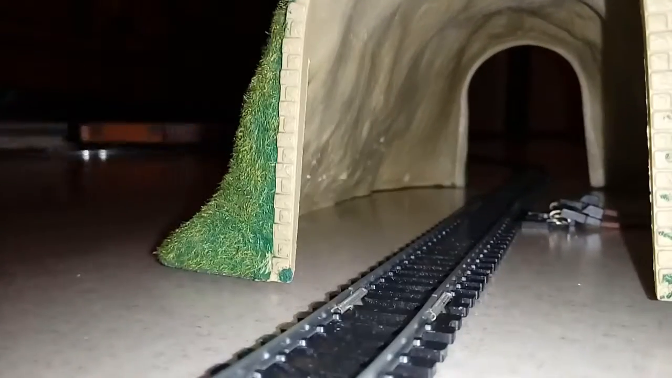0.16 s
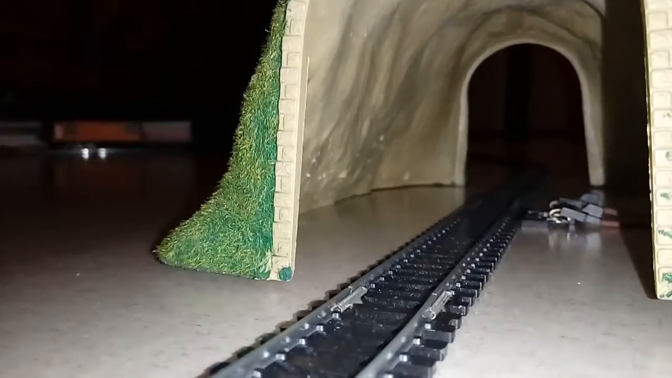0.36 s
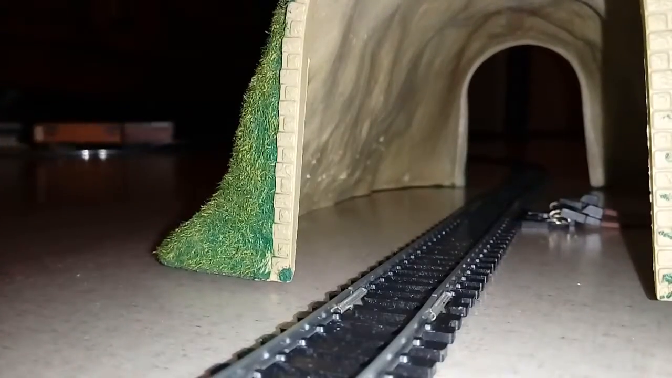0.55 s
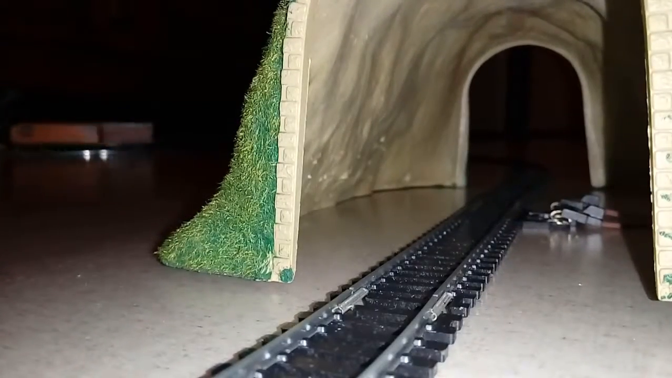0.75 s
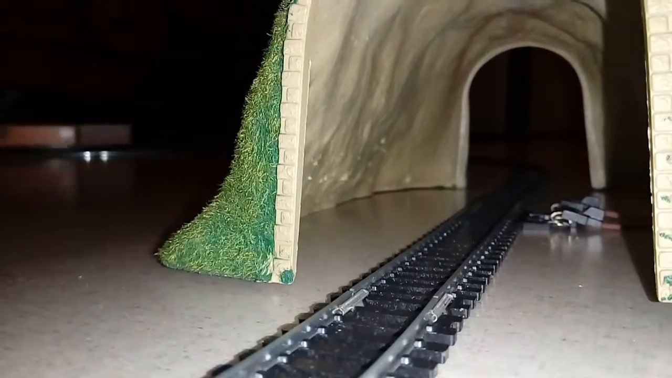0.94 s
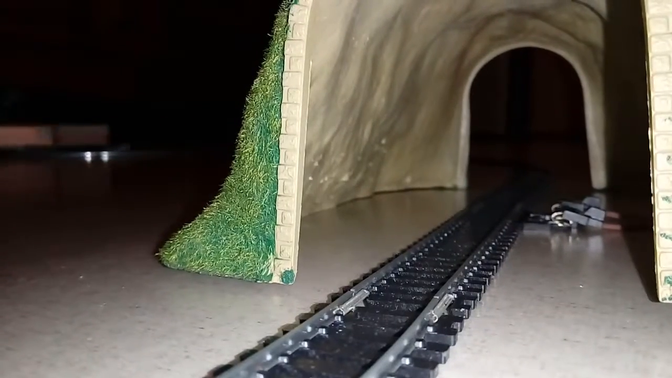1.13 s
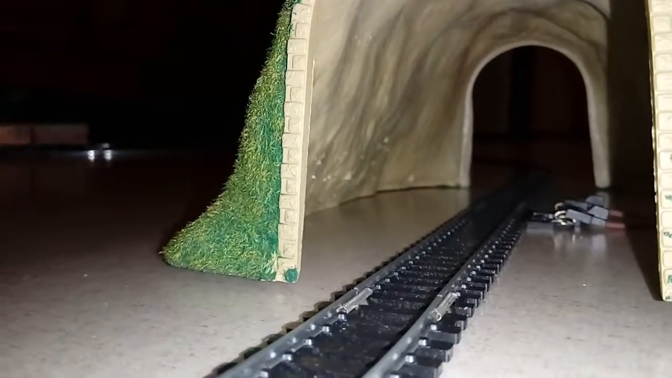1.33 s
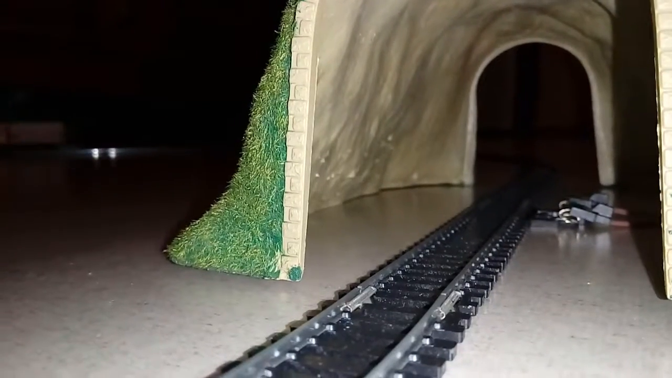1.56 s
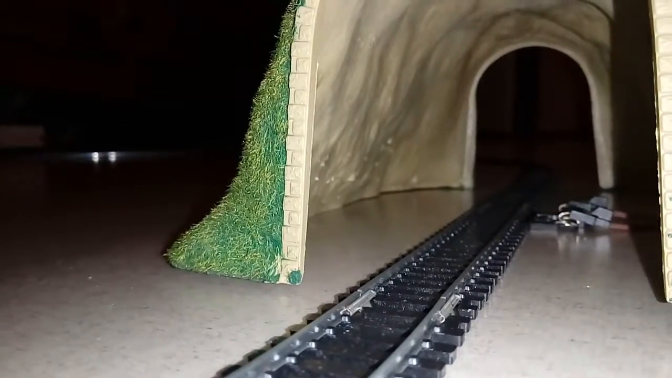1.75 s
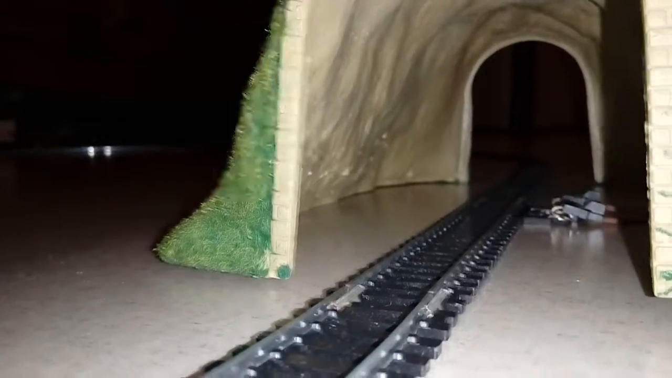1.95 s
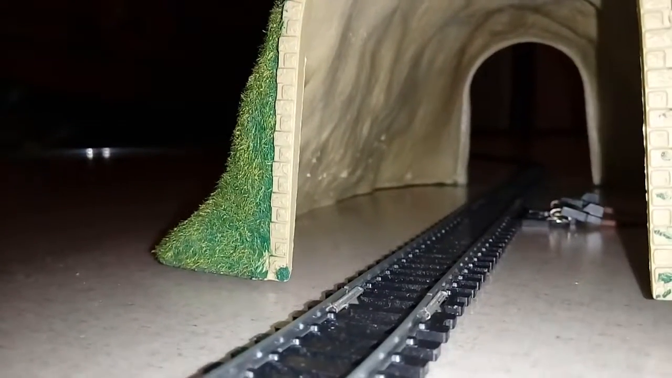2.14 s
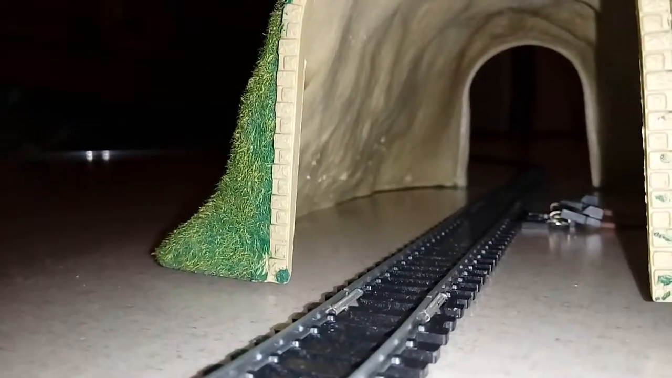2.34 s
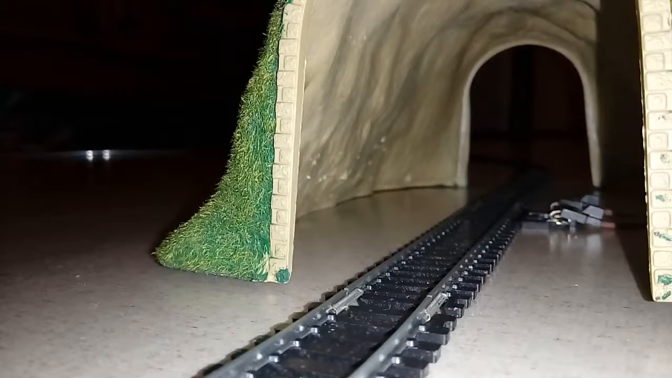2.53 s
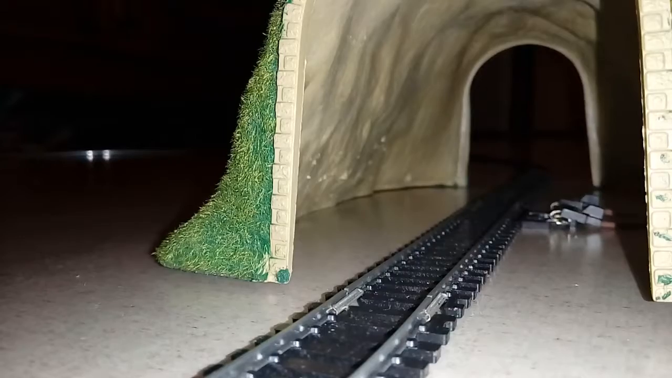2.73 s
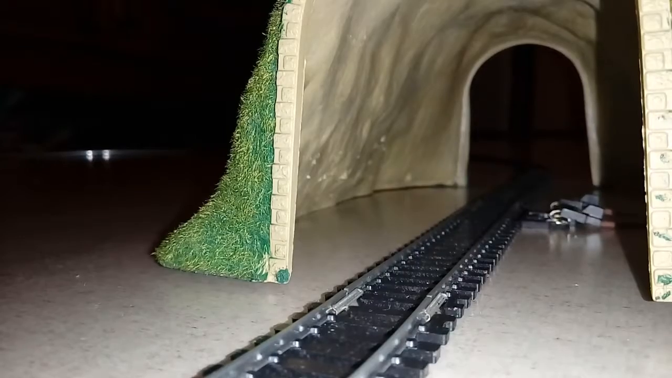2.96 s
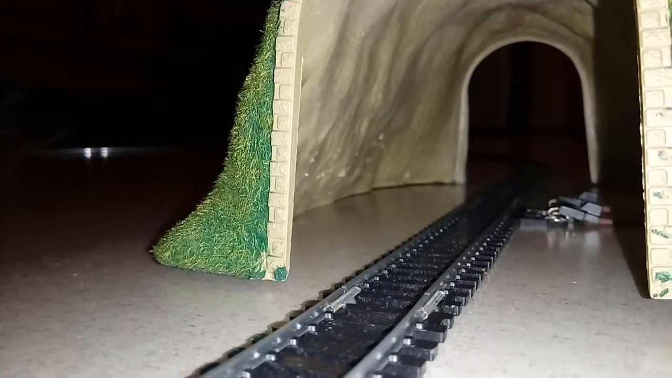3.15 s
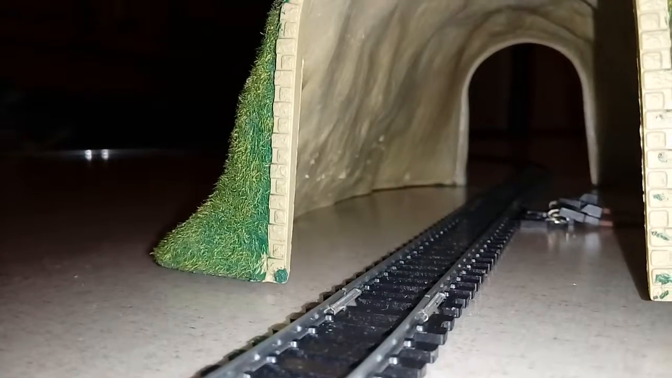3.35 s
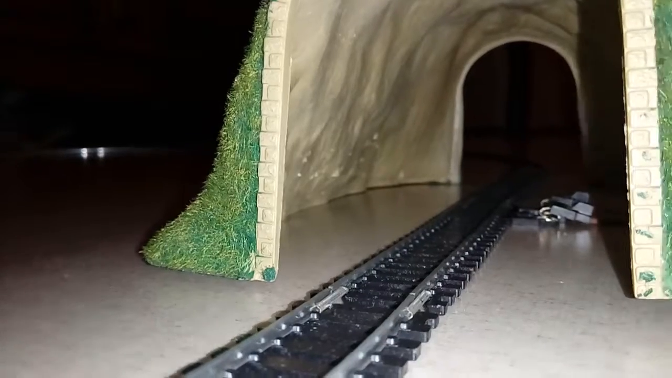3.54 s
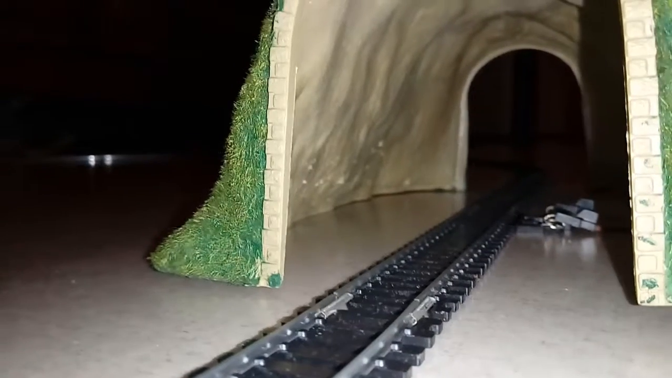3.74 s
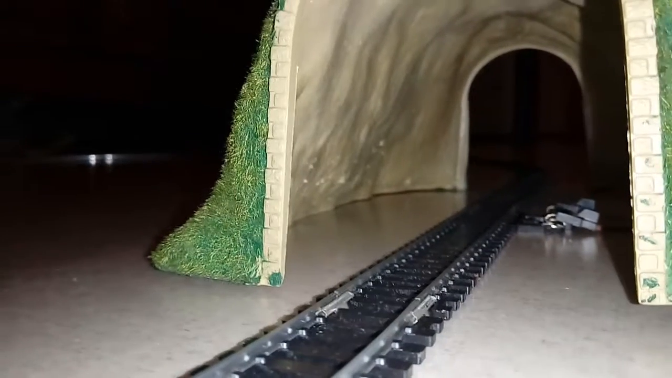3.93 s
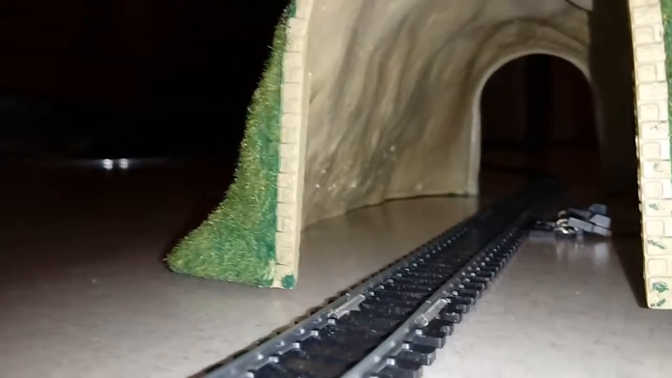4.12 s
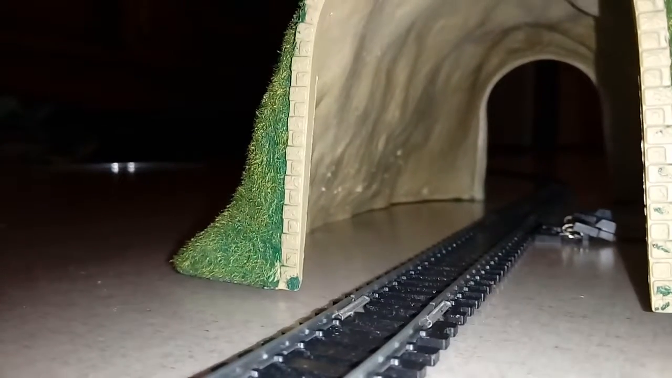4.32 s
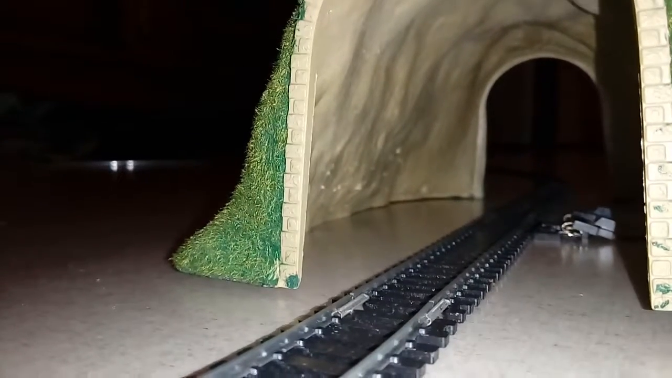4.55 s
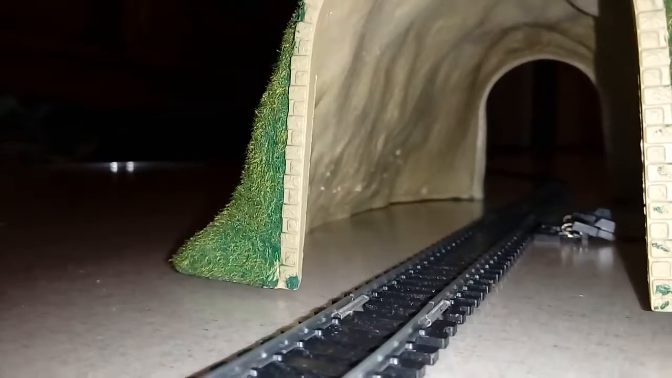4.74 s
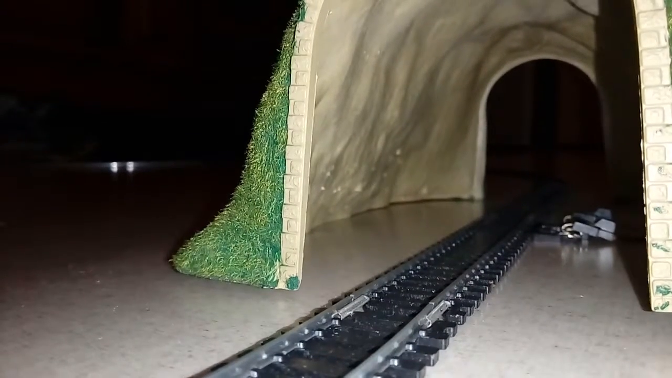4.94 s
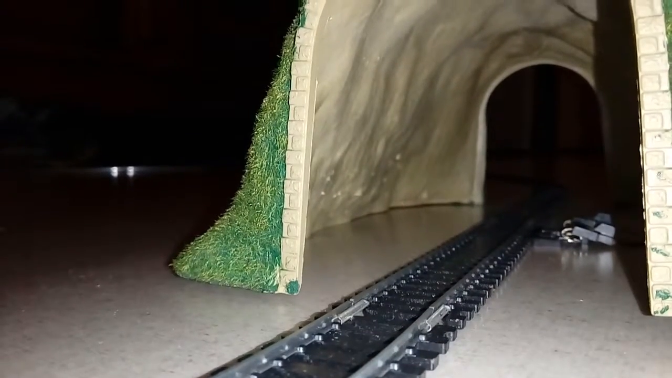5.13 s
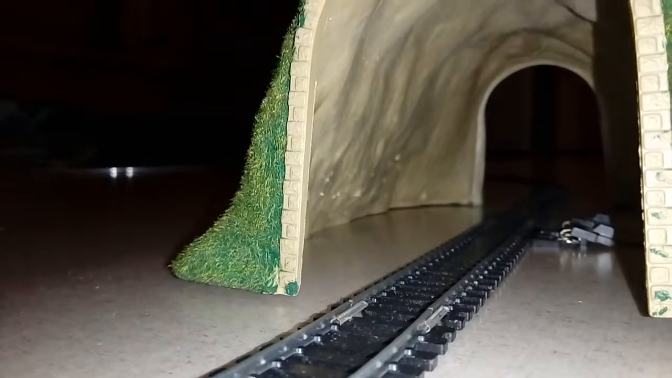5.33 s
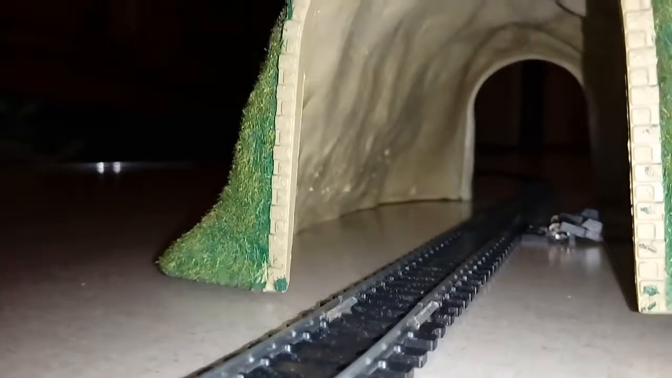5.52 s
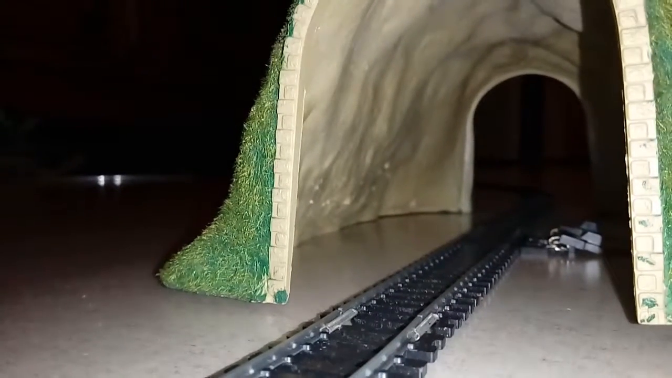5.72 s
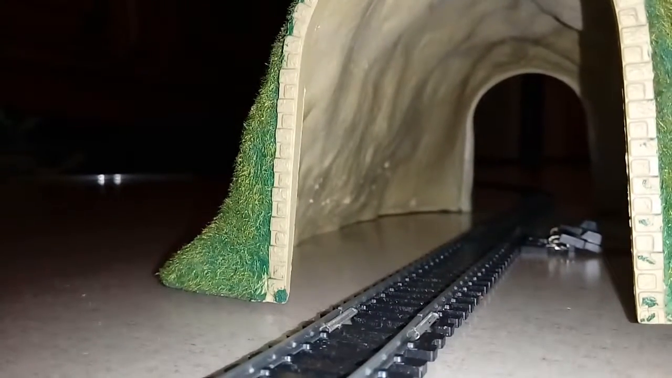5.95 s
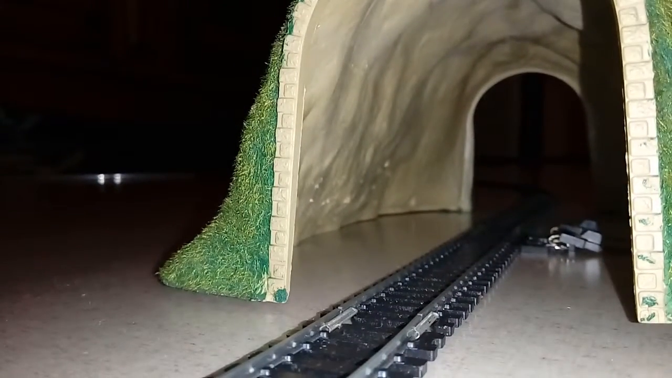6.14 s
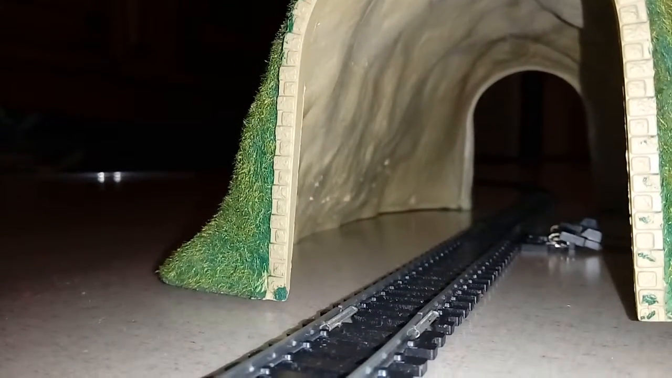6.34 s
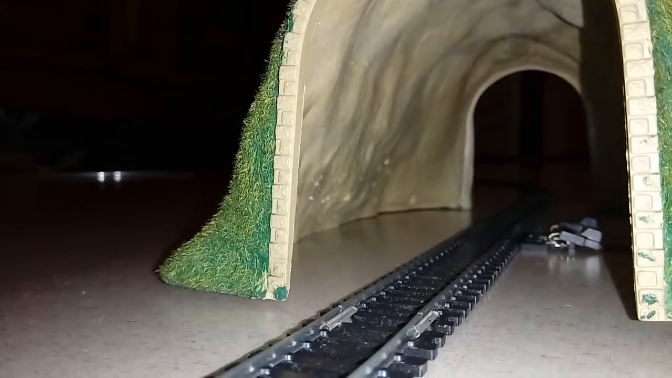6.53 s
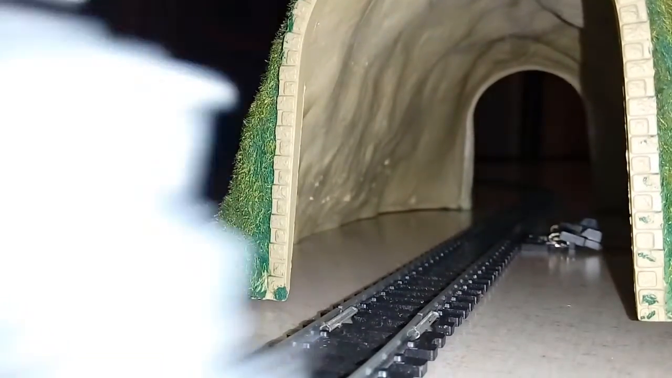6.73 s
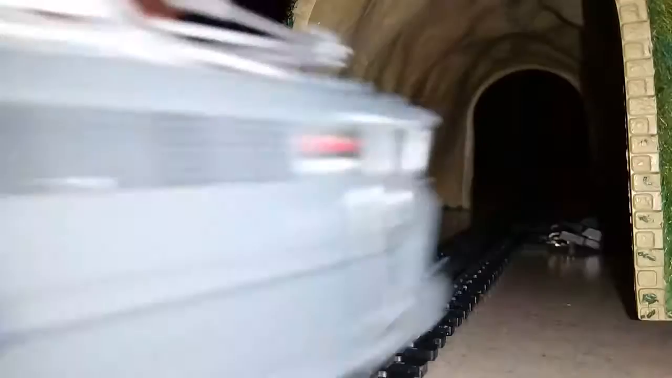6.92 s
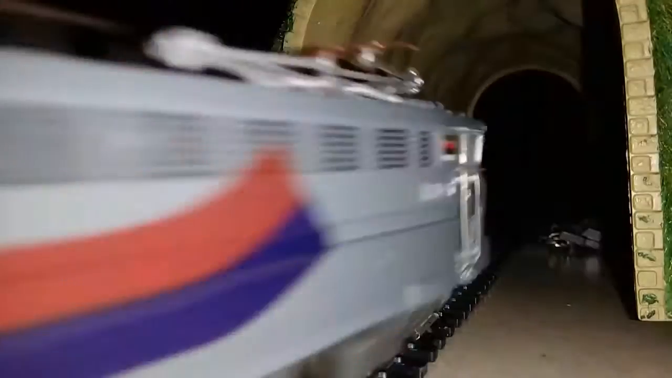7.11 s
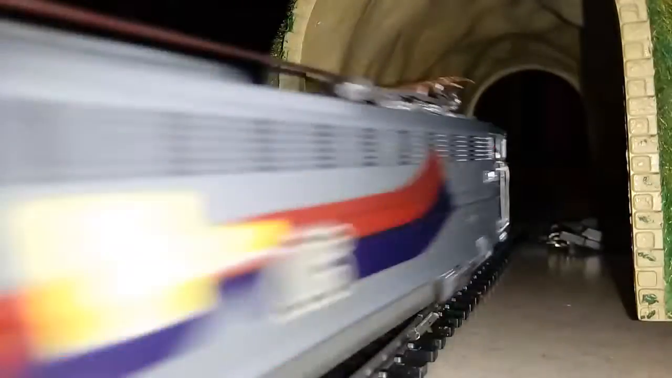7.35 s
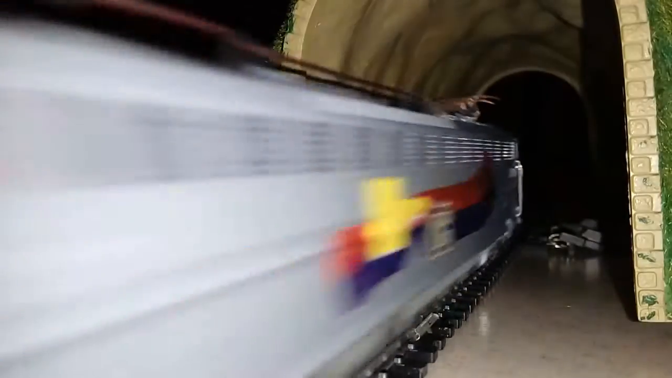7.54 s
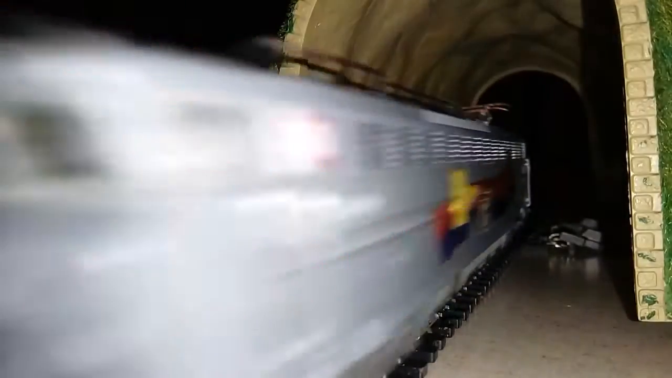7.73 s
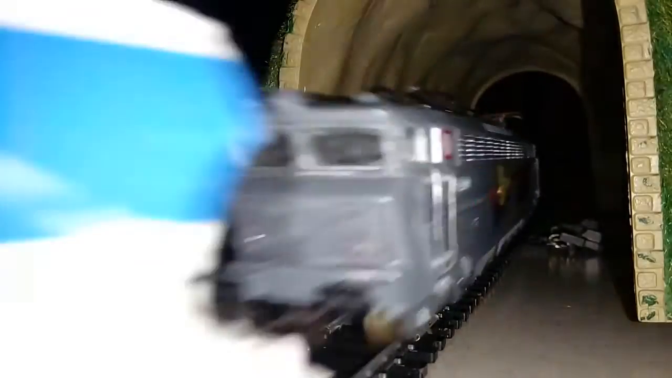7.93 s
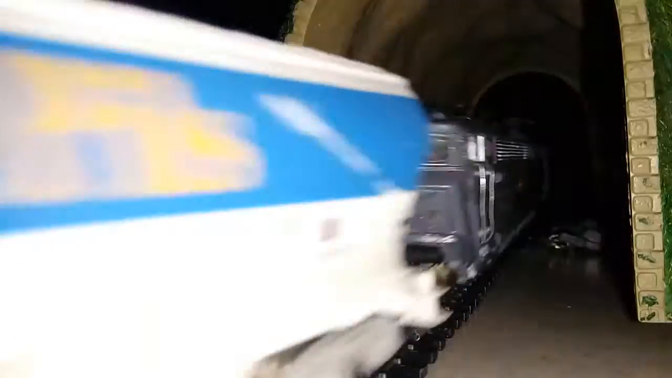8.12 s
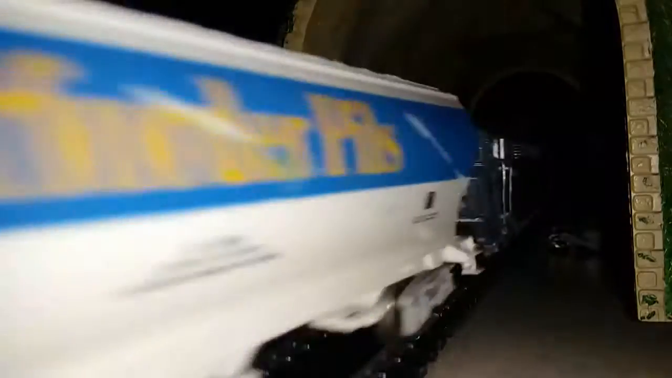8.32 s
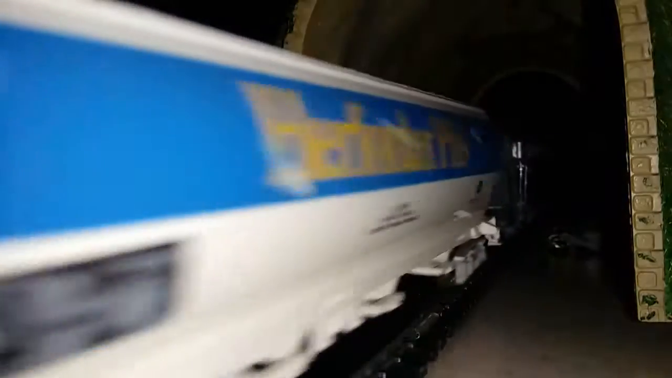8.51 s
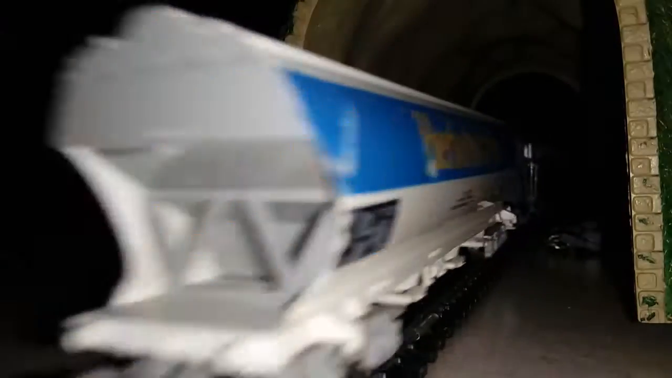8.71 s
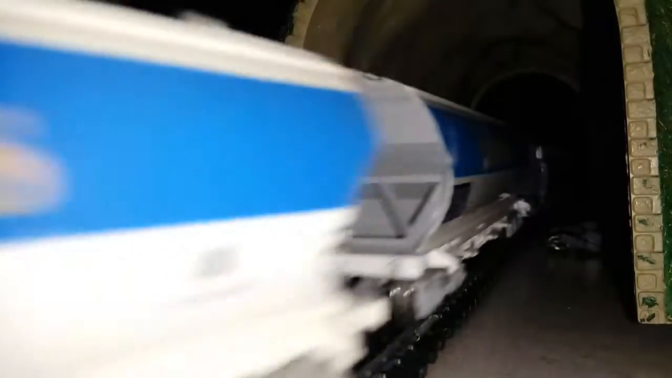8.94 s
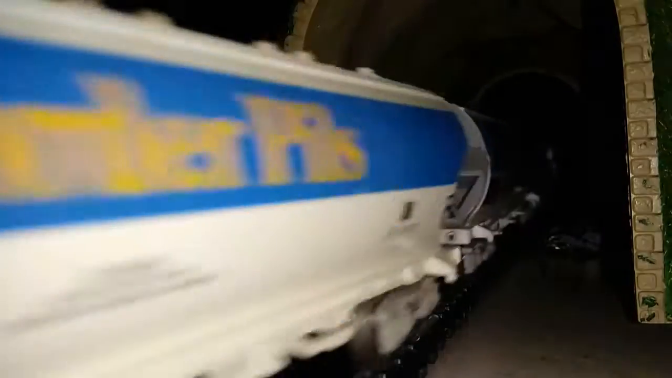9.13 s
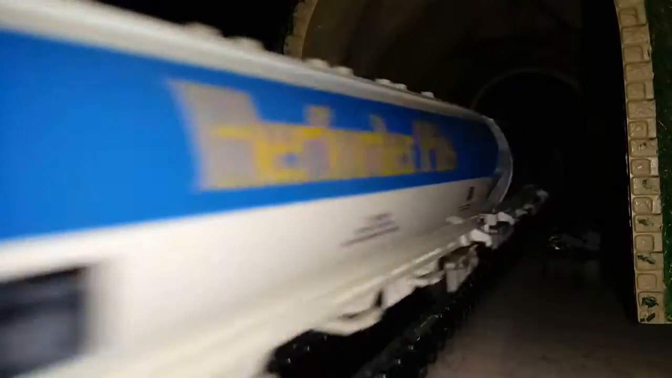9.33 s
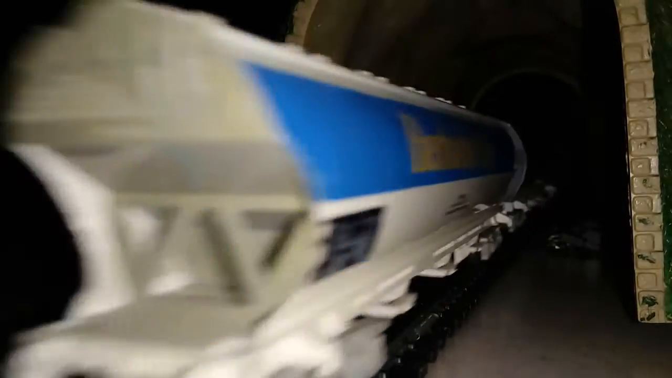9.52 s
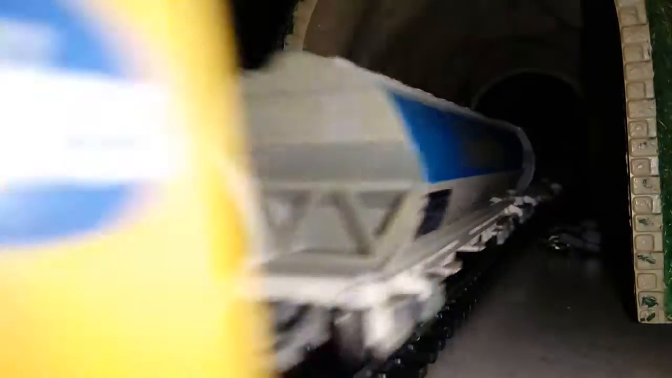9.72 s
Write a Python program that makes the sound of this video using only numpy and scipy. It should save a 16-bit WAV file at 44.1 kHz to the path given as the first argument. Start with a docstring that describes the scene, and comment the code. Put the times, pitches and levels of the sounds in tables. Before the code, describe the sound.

Close hand-held microphone indoors, beside a model railway on a hard floor. A nasal, buzzing motor and gear whine runs throughout, with soft handling thumps and dry plastic clicks over its first half. It gets harsher and louder as the engine approaches, peaks with rolling noise and rail-joint clacks as it passes, then drops to a duller, quieter rasp behind the wagons.

```python
"""The whine and rasp of a small electric model train come first, with fingers thumping on a camera case.
The train circles a hard floor, comes round, passes the hand-held camera and enters a tunnel.
Motor and gears make noise in step with the shaft, which rings the plastic shell and the chassis.
Wheels roll and click over rail joints; the motor's hum joins in when the engine is near.
Fingers shift on the case with falling soft thumps, short knocks and dry ticks."""
import sys
import numpy as np
from scipy import signal
from scipy.fft import rfft, irfft, next_fast_len
from scipy.io import wavfile
from scipy.ndimage import uniform_filter1d, map_coordinates

SR = 44100
rng = np.random.default_rng(int(sys.argv[2]) if len(sys.argv) > 2 else 0)


def generate_wav(signal):
    """Clip the signal to [-1, 1] and save it as 16-bit WAV at the path in sys.argv[1]."""
    frames = np.transpose(np.atleast_2d(signal))
    scaled = np.clip(frames, -1, 1) * 32767
    pcm = np.round(scaled).astype(np.int16)
    wavfile.write(sys.argv[1], SR, pcm)


N = 430857  # length in samples

# How fast the motor shaft turns: [t/s, f/Hz]
SHAFT_SPEED = [(0.0, 43.43), (0.5, 42.17), (2.49, 44.92), (2.99, 46.4), (3.8, 47.28), (4.99, 47.23),
               (5.99, 49.5), (6.49, 48.32), (7.3, 48.48), (7.98, 46.3), (8.48, 45.5), (9.78, 46.76)]
# The train's parts before its treble falls away: [t/s, whine level/dB, shell rattle level/dB, chassis rattle
# level/dB, rolling level/dB]
TRAIN_LEVELS = [(0, -31.5, -38, -46.5, -44.5), (.27, -30.5, -38, -45, -47), (.62, -30.5, -38.5, -47, -49),
                (1.2, -31.5, -35.5, -47, -48.5), (1.99, -31, -39, -47, -48),
                (3.3, -31, -35.5, -44.5, -47.5), (4.1, -31.5, -33.5, -45.5, -46.5),
                (4.46, -28, -32.5, -44, -46), (4.75, -31.5, -32, -43, -46),
                (5.25, -28.5, -29.5, -38, -44.5), (6.04, -31, -30.5, -35.5, -43),
                (6.24, -32, -26, -35, -43.5), (6.61, -25.5, -26.5, -35, -36), (7.05, -21, -28, -36, -32),
                (7.24, -23, -28.5, -36.5, -32), (7.7, -32, -29.5, -38, -40.5), (8.3, -32, -33, -39.5, -47),
                (8.6, -33.5, -33, -39, -44), (8.71, -32, -31, -40.5, -40), (8.82, -33, -33.5, -41.5, -43),
                (8.97, -31, -34, -41.5, -42), (9.5, -35, -33.5, -44, -44.5), (9.77, -35, -36, -48.5, -48.5)]
# Side of the train facing the camera: [t/s, side], with side 0 tail (also below 0), 1 far flank,
# 2 rounding the curve, 3 nose, 4 alongside, 5 entering the tunnel, 6 wagons only (also above 6)
FACING_SIDE = [(0, -0.5), (.7, 1.1), (1.5, 1.83), (2.5, 1.04), (3.5, 1.14), (4.6, 0.97), (5.1, 2), (5.7, 2),
               (6.2, 3.5), (6.8, 3.5), (7.5, 4), (8, 5), (8.5, 5), (8.9, 9), (9.3, 6), (9.77, 6)]
# Ways each part likes to ring: [f/Hz, width/Hz, then relative level/dB for each of the seven sides]
SHELL_MODES = [(1794, 236, -57.5, -58, -47.5, -45, -40.5, -55.5, -49.5),
               (2008, 280, -58.5, -55, -48, -50, -45.5, -51, -54.5),
               (2152, 230, -52.5, -48.5, -50, -52, -53.5, -50.5, -49),
               (2309, 302, -56.5, -52.5, -44.5, -44, -43, -48, -51.5),
               (2544, 220, -64, -61.5, -53, -50, -45.5, -55, -57.5),
               (2780, 386, -54.5, -60, -50, -45, -48.5, -56, -60.5),
               (3012, 190, -60, -65, -51, -47.5, -47.5, -59, -56.5),
               (3197, 280, -65, -64.5, -51.5, -47, -46.5, -50, -56)]
CHASSIS_MODES = [(3500, 364, -67.5, -60.5, -57.5, -62, -53, -56.5, -59.5),
                 (3810, 610, -67, -68.5, -58, -56.5, -58, -60, -59),
                 (4311, 660, -59.5, -62, -56, -53, -56, -62, -62),
                 (4727, 490, -67.5, -65, -59, -60, -57.5, -69, -63.5),
                 (5150, 940, -72, -66, -60, -56.5, -62, -69.5, -67),
                 (5867, 840, -77.5, -71.5, -67, -63, -60, -70, -67.5),
                 (6530, 660, -85, -78.5, -71, -77, -64.5, -72.5, -71),
                 (7110, 1200, -90, -84.5, -79, -76, -80.5, -80, -78)]
WHINE_MODES = [(1352.4, 131, -3, -5, -5.5, -1.5, -2.5, -1.5, -2.5),
               (1437.4, 80, 1.5, -2, -3, -1.5, 0, 6, 0), (1512.5, 110, -6, -3.5, -2, -1.5, -6.5, -8, -1),
               (1628, 136, -11, -15, -10.5, -0.5, -11.5, -9, -4.5)]
TRACK_MODES = [(396, 430, -17.5, -17.5, -16.5, -24.5, -19.5, -19, -21.5),
               (582, 197, -6.5, -8.5, -15.5, -7, -11.5, -14.5, -11),
               (742, 92, -11, -14, -11.5, 1, -21.5, -10, -12),
               (873.5, 147, -3, -1.5, -4.5, -8, -8.5, -4.5, -2), (997, 140, -5, -0.5, -2, 1, -3, -4.5, 1.5),
               (1097, 170, 1.5, 2, 3.5, 2, 1, 2, 2.5), (1222, 120, 8, 3, 4, 9, 2.5, -4.5, -7)]
# Rasp within one turn: [cycles per turn, lead/rad, swing/dB of whine, of shell, of chassis, of brush hiss]
RASP_SWINGS = [(1, 0, 0, 0.58, 1.1, 2.8), (2, 2.5, -2, 1.6, 0.9, 2.5), (3, 1.1, 1, 1.8, 1.3, 3),
               (5, 2.5, 1.5, 0.62, 0.59, .8)]
# Kick of each of the three armature poles: relative level/dB
POLE_KICKS = [-0.5, -4.5, -11]
# Pole kicks against steady gear noise, one for each side: relative level/dB
KICK_SHARE = [-7.5, -9.5, -7.5, -3.5, -2.5, -8, -12]
# The train's treble falls away above 7 kHz: [f/Hz, gain/dB]
TRAIN_TREBLE_FALL = [(5000, 0), (7000, 0.5), (8000, -4), (10000, -19), (16000, -32.5)]
# Brush hiss over time: [t/s, then level/dB of each band before the band's own trim]
BRUSH_LEVELS = [(0.0, -70, -83, -78.5), (0.46, -81, -86, -78.5), (1.66, -81.5, -80, -79),
                (2.18, -75.5, -85, -79), (3.62, -76.5, -89, -77.5), (4.76, -75.5, -87.5, -77.5),
                (5.22, -64, -83, -71.5), (5.66, -69, -79, -75.5), (6.04, -67, -72, -76.5),
                (6.5, -69.5, -78, -73.5), (6.88, -67, -71, -71.5), (7.32, -66.5, -70.5, -76),
                (8.25, -69.5, -79, -75.5), (9.77, -80, -83, -79)]
# The three brush bands: [f/Hz, width/Hz, trim/dB]
BRUSH_BANDS = [(8590, 2000, 0.5), (11150, 2800, -1), (14900, 2400, 1)]
# Tone of the quiet room: [f/Hz, relative level/dB]
ROOM_TONE = [(20, -20), (60, 0), (120, 0.5), (300, -2.5), (500, -11.5), (800, -2.5), (1100, -28.5),
             (1800, -120)]
# Tone of the microphone hiss: [f/Hz, relative level/dB]
HISS_TONE = [(5000, -15.5), (7500, -5), (9500, -5.5), (13700, -6), (14500, -2), (15200, 1.5), (17000, 0.5)]
# Finger thumps on the case: [t/s, relative push level/dB, relative knock over push/dB]
FINGER_THUMPS = [(0.067, -40, -13), (0.783, -38, -7), (0.796, -38.5, -6), (1.057, -33.5, -15),
                 (1.191, -35, -6), (1.214, -34.5, -8), (1.283, -32, 1), (1.292, -37, 0), (1.302, -34, 0),
                 (1.324, -37, -6), (1.334, -39.5, 3), (1.413, -35, 1), (1.424, -34.5, 3),
                 (1.507, -37.5, -1), (1.672, -36, -5), (1.718, -41.5, 2), (1.877, -41, 1),
                 (1.943, -42, 0.5), (2.131, -41.5, 3), (2.306, -38.5, -5), (3.121, -33, -17),
                 (3.144, -36, -13), (3.453, -34, -1), (3.483, -35, -2), (3.767, -37, -7),
                 (3.795, -35.5, -3), (4.194, -39, -8), (4.216, -40, -3), (4.435, -42, -3),
                 (4.957, -35, -14), (5.016, -24, 3), (5.248, -39, 2), (5.28, -40, -10), (5.352, -36, -6),
                 (5.363, -31.5, 3), (5.38, -31.5, -18), (5.402, -34, -2), (5.438, -35, -6),
                 (5.611, -37, -7), (5.636, -38, -12), (6.202, -44, 7), (6.31, -35, -11)]
# Tone of the gripping hand: [f/Hz, relative level/dB]
HAND_TONE = [(25, -12.5), (50, -7), (90, 4.5), (150, -2.5), (250, -1.5), (500, -7.5), (900, -26.5),
             (1800, -120)]
# Dry ticks of the case: [t/s, relative level/dB, relative bright edge level/dB]
CASE_TICKS = [(1.1838, -25.5, -66), (1.2994, -23, -71), (1.425, -21, -66), (1.6804, -36, -71),
              (3.4542, -22, -58), (5.249, -23.5, -61.5)]
# Tone of a tick's snap: [f/Hz, gain/dB]
SNAP_TONE = [(800, -33), (2500, -1), (4400, 4), (5500, -1.5), (7000, -19), (8500, -34), (16000, -70.5)]
# Tone of a tick's bright edge: [f/Hz, gain/dB]
EDGE_TONE = [(5000, -34), (8500, -1), (12000, -3), (16000, -11)]
# Wheels on rail joints: [t/s, relative level/dB, middle ring f/Hz, relative wagon shake over ring/dB]
RAIL_JOINTS = [(4.5265, -30, 3886, -9), (4.906, -27, 4254, -6), (5.7134, -21, 4260, -10),
               (5.7415, -24, 4230, -5), (5.8481, -23, 4250, -8), (6.147, -23, 3730, -11),
               (6.5116, -24, 4770, -3), (6.9311, -26, 5497, -5), (7.2184, -17.5, 3520, -10),
               (7.4163, -18.5, 4360, -4.5), (7.449, -20, 4750, -5), (7.5765, -13, 4294, -13.5),
               (7.651, -21, 4746, -4), (7.7474, -21, 4740, -6), (7.7984, -28, 3500, -8),
               (8.297, -26, 3575, -3), (8.4087, -25, 3580, -8), (8.735, -26, 3580, -6),
               (9.4807, -26.5, 4950, 2.5), (9.5248, -25.5, 4966, -1), (9.622, -31, 5350, -6),
               (9.7155, -32, 4710, -3)]
# Tone of a shaken wagon: [f/Hz, gain/dB]
WAGON_TONE = [(400, -29.5), (900, -4), (2500, 2), (5500, -3), (7000, -14), (9000, -36), (16000, -53.5)]
# Motor hum close by, before fade-in and trim: [t/s, low order level/dB, commutator buzz level/dB]
HUM_LEVELS = [(5.6, -80, -66), (6.06, -81, -62), (6.3, -65.5, -51.5), (6.8, -55, -47), (7.19, -58, -46.5),
              (7.55, -56.5, -65), (8.2, -65, -64), (8.4, -82, -63.5), (8.96, -69, -54), (9.4, -75, -66)]
# Tones in the hum: [cycles per shaft turn, relative level/dB]
HUM_ORDERS = [(3, -18), (4, -18.5), (5, -7), (6, 0), (7, -17.5), (8, -16.5), (9, -13), (10, -10),
              (11, -10.5), (12, -1), (13, -4), (15, -19)]

ROOM_DB, HISS_DB = -59.5, -72
# Hand rumble: peak added around each thump, half-width of that bump in time, and the still hand
GRIP_DB, GRIP_S, STILL_DB = -60.5, 0.092, -71.5
# A small companion to each thump: scatter in time, middle push level, middle knock over push
FUMBLE_S, FUMBLE_DB, FUMBLE_KNOCK_DB = 0.06, -44.5, -4
TOP_HZ = 15530  # band limit of the camera


def amp(db):
    """Turn decibels into gain."""
    return 10 ** (np.asarray(db) / 20)


def unit(x):
    """Scale to an average (rms) strength of 1."""
    return x / np.sqrt(np.mean(x ** 2) + 1e-20)


def curves(rows):
    """Draw straight lines between rows: one value per sample for each column after the time."""
    s, *cols = np.transpose(rows)
    return [np.interp(np.arange(N) / SR, s, c) for c in cols]


def wobble(rate):
    """Make a smooth random curve with rate knots a second."""
    knots = rng.standard_normal(int(N * rate / SR) + 4)
    return map_coordinates(knots, [np.arange(N) * rate / SR])


def coloured(x, gain):
    """Filter x by a gain over frequency, with no sound before its cause (minimum phase)."""
    hz = np.fft.rfftfreq(4096, 1 / SR)
    cepstrum = irfft(np.log(gain(hz) + 1e-9))
    # folding the cepstrum forward puts the response after its cause
    cepstrum[1:2048] *= 2
    cepstrum[2049:] = 0
    response = irfft(np.exp(rfft(cepstrum)))
    return signal.oaconvolve(x, response)[:N]


def modes(rows):
    """Give the gain of steep resonances (f/Hz, width/Hz, level/dB) adding in power."""
    def gain(f):
        power = 0
        for centre, width, db in rows:
            detuning = (f * f - centre * centre) / (f * width + 1)
            power = power + amp(db) ** 2 / (1 + detuning ** 2) ** 3
        return np.sqrt(power)
    return gain


def slope(points):
    """Give the gain that joins (f/Hz, level/dB) points on a log frequency axis."""
    f, db = np.transpose(points)
    return lambda hz: amp(np.interp(np.log(hz + 1), np.log(f + 1), db))


def patchy(depth_db, bins, frames):
    """Noise with drifting narrow peaks, as echoes from floor and walls change along the track."""
    z = signal.stft(rng.standard_normal(N), nperseg=2048)[2]
    field = uniform_filter1d(rng.standard_normal(z.shape), bins, 0)
    field = uniform_filter1d(field, frames, 1)
    return signal.istft(z * amp(depth_db * unit(field)), nperseg=2048)[1][:N]


def place(times, shapes):
    """Start each row of shapes at its time and add them all up."""
    starts = np.round(np.asarray(times) * SR).astype(int)[:, None]
    at = starts + np.arange(shapes.shape[1])
    return np.bincount(at.ravel(), shapes.ravel(), N + SR)[:N]


def shaft_angle():
    """Add up the slightly unsteady shaft speed into the angle turned, in radians."""
    turns_per_second = curves(SHAFT_SPEED)[0] + 0.25 * wobble(6)
    return 2 * np.pi * np.cumsum(turns_per_second) / SR


def rasp(angle, column):
    """Contacts press harder at some points of each turn, so loudness follows the shaft."""
    return amp(sum(row[column] * np.cos(row[0] * angle + row[1]) for row in RASP_SWINGS))


def kicks(angle):
    """Each pole passing the magnet jolts the gears, a little early or late."""
    poles = len(POLE_KICKS)
    pole = np.floor(angle * poles / (2 * np.pi) + 0.1184 * wobble(120)).astype(int)
    # a pole counts only once, even if the timing wobbles back
    passing = np.maximum(np.diff(np.maximum.accumulate(pole), prepend=0), 0)
    strength_db = np.take(POLE_KICKS, pole % poles) + 2.8 * wobble(150)
    return unit(passing * amp(strength_db))


def turning(source, table):
    """One body rings to a noise source, its modes balanced by the side that faces the camera."""
    side_columns = range(2, len(table[0]))
    facing = np.clip(curves(FACING_SIDE)[0], 0, len(side_columns) - 1)
    sides = [unit(coloured(source, modes([(m[0], m[1], m[k]) for m in table]))) for k in side_columns]
    # neighbouring sides crossfade
    return sum(np.clip(1 - abs(facing - k), 0, 1) * side for k, side in enumerate(sides))


def train(angle):
    """Gear noise rings shell and chassis; wheels roll on the track; the treble of it all falls away."""
    whine_db, shell_db, chassis_db, rolling_db = curves(TRAIN_LEVELS)
    share_db = np.interp(curves(FACING_SIDE)[0], np.arange(len(KICK_SHARE)), KICK_SHARE)
    jolts = kicks(angle) * amp(share_db)
    whine_gears = unit(rasp(angle, column=2) * patchy(3.13, 2, 16)) + jolts
    shell_gears = unit(rasp(angle, column=3) * patchy(2.45, 2, 10)) + amp(-1) * jolts
    worn_teeth = amp(0.26 * wobble(30) + 1.45 * wobble(250))
    chassis_gears = rasp(angle, column=4) * worn_teeth * patchy(1.9, 2, 10)
    body = amp(whine_db) * turning(whine_gears, WHINE_MODES)
    body += amp(shell_db) * turning(shell_gears, SHELL_MODES)
    body += amp(chassis_db) * turning(chassis_gears, CHASSIS_MODES)
    body += amp(rolling_db) * turning(patchy(2.66, 2, 10), TRACK_MODES)
    return coloured(body, slope(TRAIN_TREBLE_FALL))


def brushes(angle):
    """Sparking brushes hiss in three treble bands, in uneven bursts that follow the shaft."""
    total = np.zeros(N)
    for level_db, (hz, width, trim_db) in zip(curves(BRUSH_LEVELS), BRUSH_BANDS):
        flicker = amp(1.5 * wobble(40) + 1.5 * wobble(300))
        sparks = rasp(angle, column=5) * flicker * patchy(2.8, 14, 14)
        band = unit(coloured(sparks, modes([(hz, width, 0)])))
        total += amp(level_db + trim_db) * band
    return total


def room():
    """The quiet room is steady low noise."""
    return amp(ROOM_DB) * unit(coloured(rng.standard_normal(N), slope(ROOM_TONE)))


def microphone_hiss():
    """The microphone adds faint, steady treble noise."""
    return amp(HISS_DB) * unit(coloured(rng.standard_normal(N), slope(HISS_TONE)))


def grip():
    """The hand rumbles on the case for a moment around every listed thump."""
    t = np.arange(N) / SR
    busy = sum(np.exp(-((t - row[0]) / GRIP_S) ** 2) for row in FINGER_THUMPS)
    lumps = amp(3.5 * wobble(25) + 4.2 * wobble(70)) * rng.standard_normal(N)
    level = np.sqrt(amp(STILL_DB) ** 2 + amp(GRIP_DB) ** 2 * busy)
    return level * unit(coloured(lumps, slope(HAND_TONE)))


def fingers():
    """List the thumps, each with a faint companion shortly before or after."""
    rows = np.array(FINGER_THUMPS)
    chance = rng.standard_normal(rows.shape)
    s = np.abs(rows[:, 0] + FUMBLE_S * chance[:, 0])
    push_db = FUMBLE_DB + 2.2 * chance[:, 1]
    knock_db = FUMBLE_KNOCK_DB + 4 * chance[:, 2]
    return np.hstack([rows.T, (s, push_db, knock_db)])


def thumps():
    """A finger on the case gives a short knock and a push that falls in pitch."""
    s, db, knock_db = fingers()[:, :, None]
    t = np.arange(2600) / SR
    # pitch starts near 1.2 times this and settles at 0.26 times it
    pitch_scale = 330 * (1 + 0.21 * rng.standard_normal((len(s), 1)))
    glide = 0.26 * t + 0.0045 * (1 - np.exp(-t / 0.0048))
    # -60 * t / T means a fall of 60 dB in T seconds
    push = amp(-60 * t / 0.041) * (1 - np.exp(-t / 0.0015)) * np.sin(2 * np.pi * pitch_scale * glide)
    knock_shape = amp(knock_db + 6.0 - 60 * t / 0.007) * (1 - np.exp(-t / 0.00054))
    knock = knock_shape * np.sin(2 * np.pi * 560 * t)
    return place(s[:, 0], amp(db + 2.5) * (push + knock))


def ticks():
    """The plastic snaps once: a single click filtered into a body and a bright edge."""
    s, db, edge_db = np.transpose(CASE_TICKS)[:, :, None]
    snap = coloured(place(s[:, 0], amp(db + 19)), slope(SNAP_TONE))
    edge = coloured(place(s[:, 0], amp(edge_db + 18.5)), slope(EDGE_TONE))
    return snap + edge


def joints():
    """A metal wheel drops on the next rail, rings briefly and shakes its wagon."""
    s, db, hz, shake_db = np.transpose(RAIL_JOINTS)[:, :, None]
    t = np.arange(1500) / SR
    spread = 1 + 0.033 * rng.standard_normal((len(s), 3))  # three ring tones, slightly apart
    ring = sum(np.sin(2 * np.pi * hz * spread[:, k:k + 1] * t) for k in range(3))
    ring_shape = amp(db - 8.0 - 60 * t / 0.027) * (1 - np.exp(-t / 0.0012))
    rings = place(s[:, 0], ring_shape * ring)
    shake_shape = amp(db + shake_db - 60 * t / 0.068)
    shakes = place(s[:, 0], shake_shape * rng.standard_normal(ring.shape))
    return rings + coloured(shakes, slope(WAGON_TONE))


def hum(angle):
    """Low shaft orders and a fuzzy commutator band, fading in as the engine nears."""
    low_db, buzz_db = curves(HUM_LEVELS)
    near = np.clip((np.arange(N) / SR - HUM_LEVELS[0][0]) / 0.4, 0, 1)
    flutter = angle + 0.04 * wobble(20)

    def line(order, db):
        return amp(db + 2.2 * wobble(9)) * np.sqrt(2) * np.sin(order * flutter)

    low = sum(line(k, db) for k, db in HUM_ORDERS if k < 10)
    high = sum(line(k, db) for k, db in HUM_ORDERS if k >= 10)
    fuzz = unit(wobble(60) * np.sin(12.1 * angle) + wobble(60) * np.cos(12.1 * angle))
    buzz = high + amp(-1.0) * fuzz
    return near * (amp(low_db) * low + amp(buzz_db - 5.5) * buzz)


def scene():
    """Add up the train, the quiet room, the microphone's hiss and the hands."""
    angle = shaft_angle()
    background = room() + microphone_hiss()
    hands = thumps() + ticks() + grip()
    engine = train(angle) + brushes(angle) + hum(angle)
    return (engine + background + hands + joints())[None]


def record(dry):
    """The camera keeps nothing above its band limit."""
    m = next_fast_len(N + SR // 2)
    keep = np.fft.rfftfreq(m, 1 / SR) < TOP_HZ
    return irfft(rfft(dry, m) * keep, m)[..., :N]


dry = scene()
out = record(dry)
generate_wav(out)
```